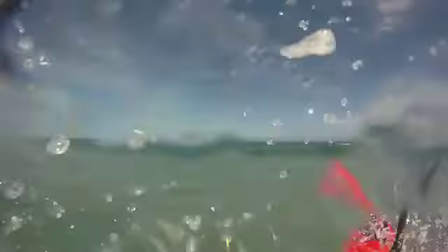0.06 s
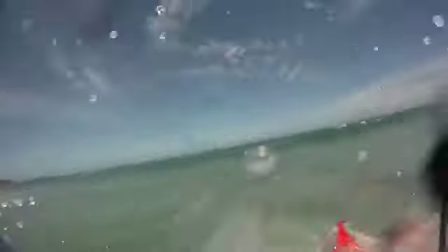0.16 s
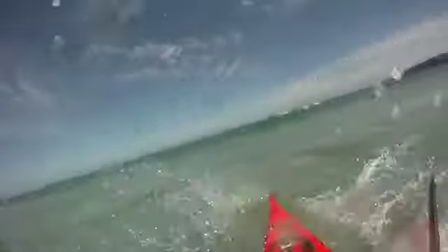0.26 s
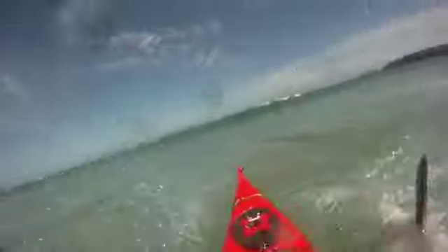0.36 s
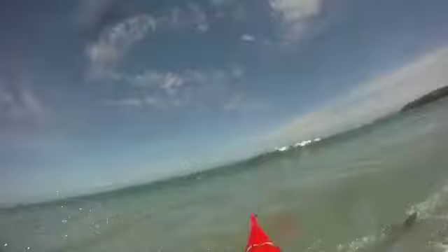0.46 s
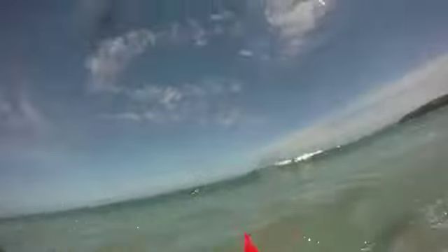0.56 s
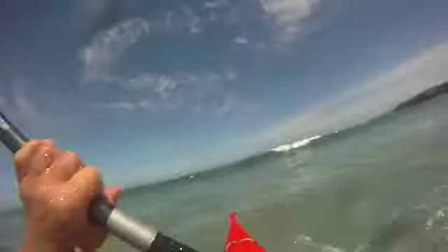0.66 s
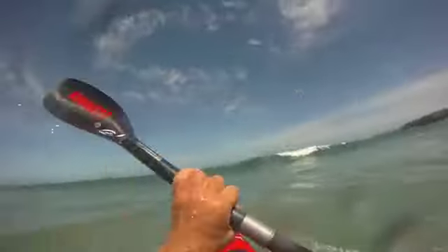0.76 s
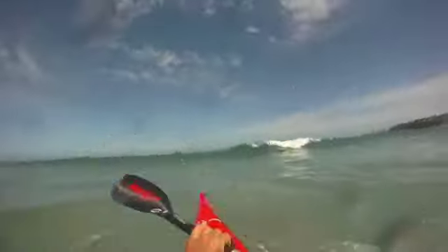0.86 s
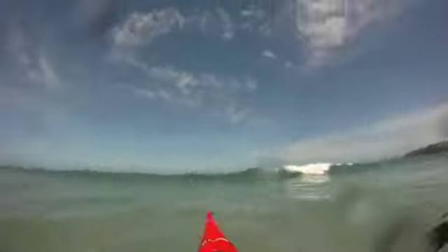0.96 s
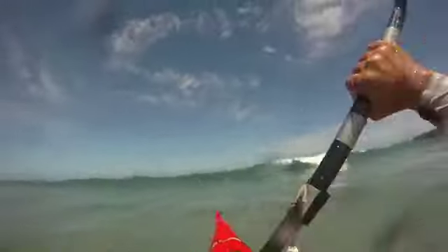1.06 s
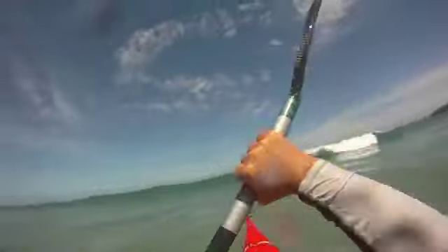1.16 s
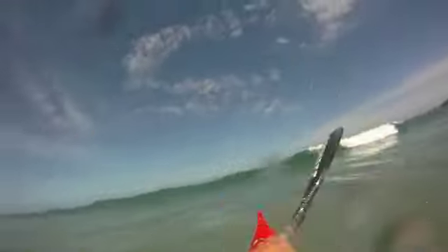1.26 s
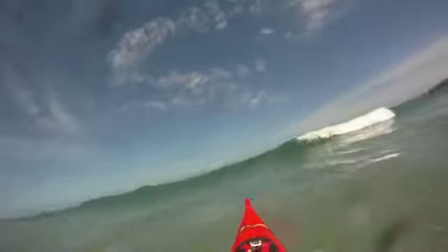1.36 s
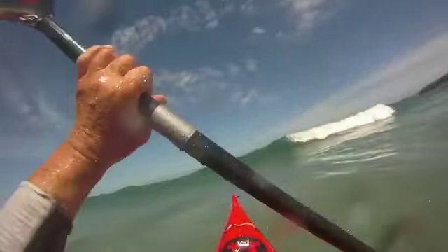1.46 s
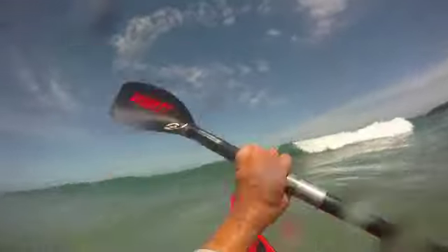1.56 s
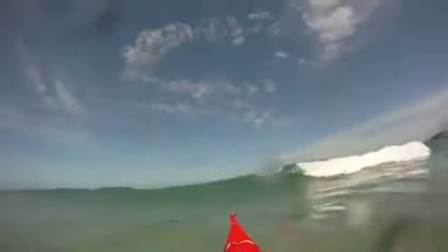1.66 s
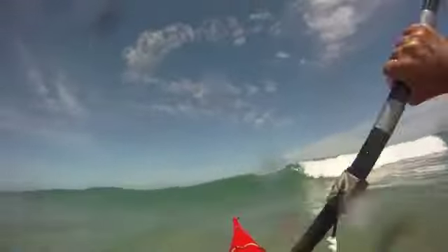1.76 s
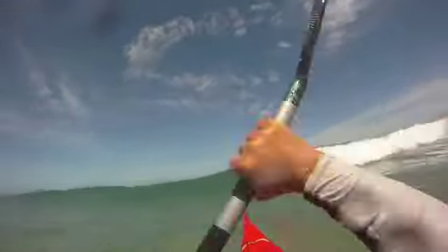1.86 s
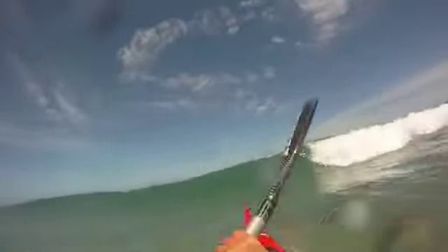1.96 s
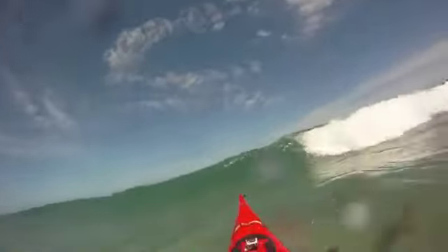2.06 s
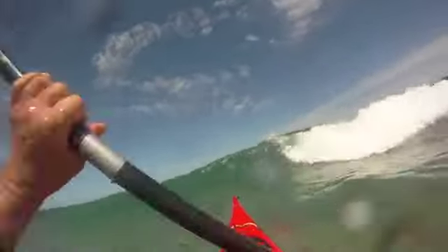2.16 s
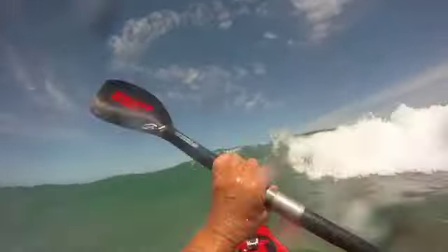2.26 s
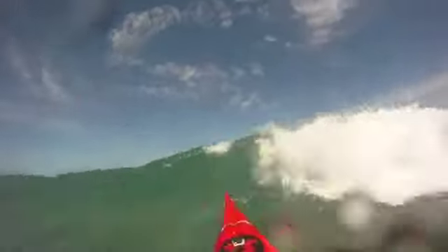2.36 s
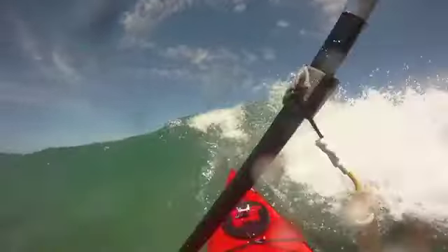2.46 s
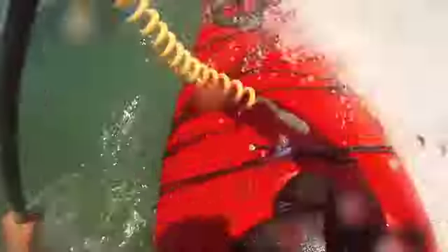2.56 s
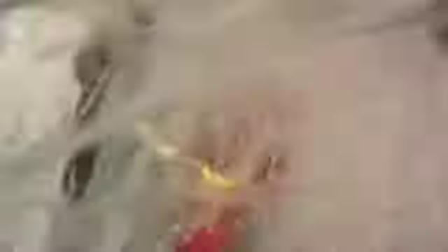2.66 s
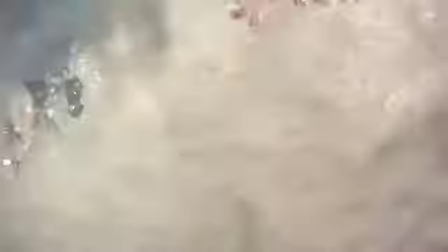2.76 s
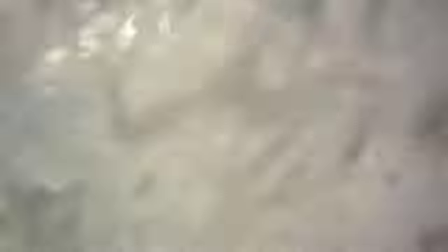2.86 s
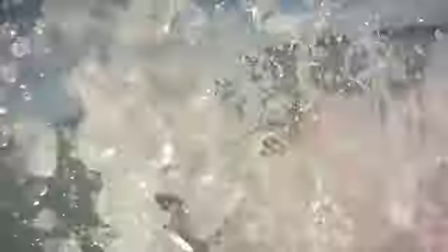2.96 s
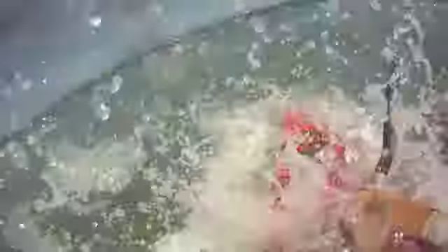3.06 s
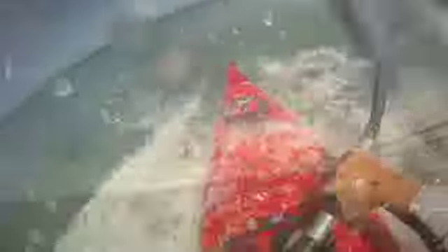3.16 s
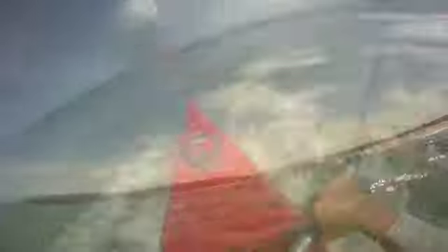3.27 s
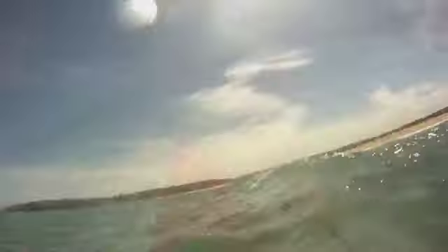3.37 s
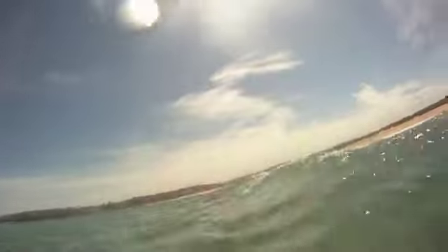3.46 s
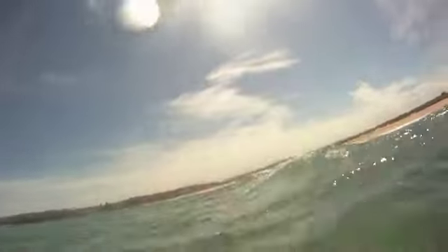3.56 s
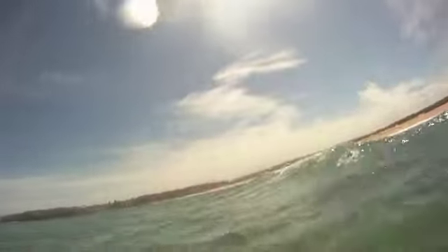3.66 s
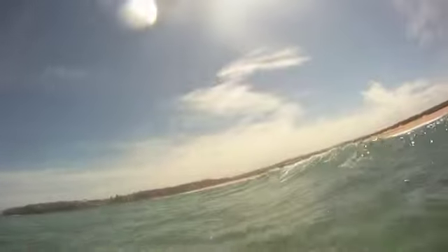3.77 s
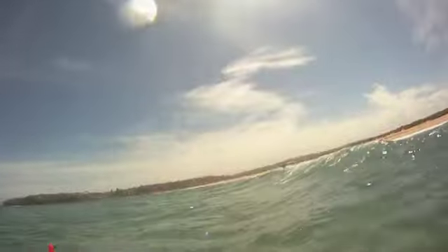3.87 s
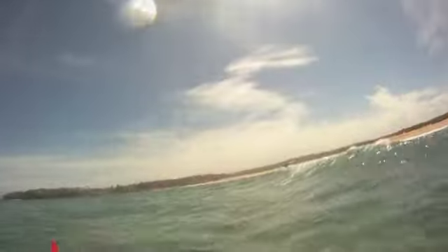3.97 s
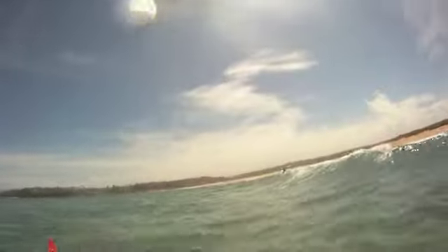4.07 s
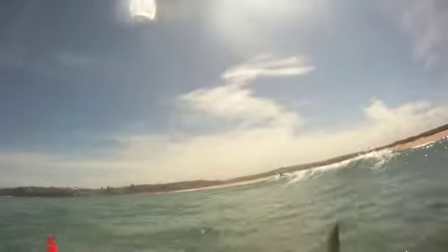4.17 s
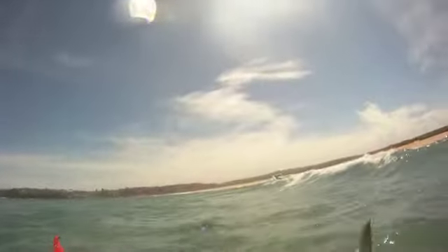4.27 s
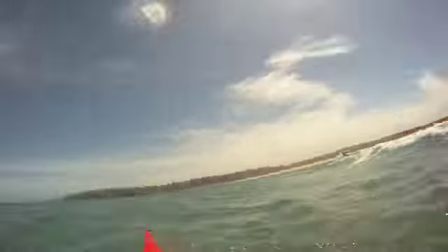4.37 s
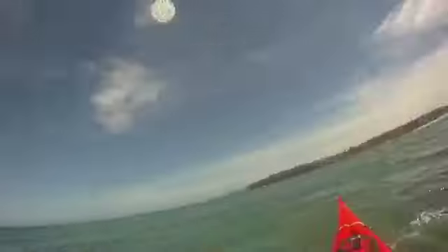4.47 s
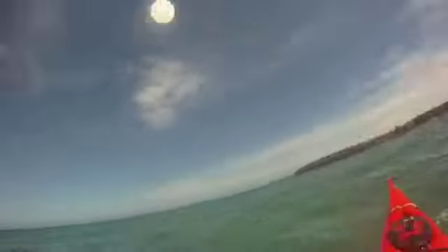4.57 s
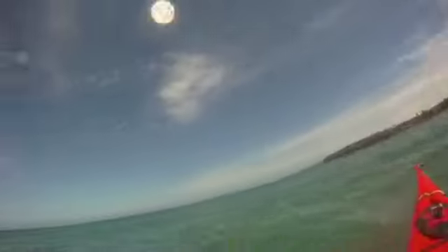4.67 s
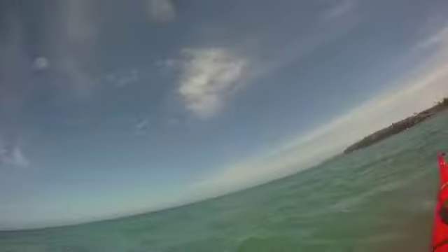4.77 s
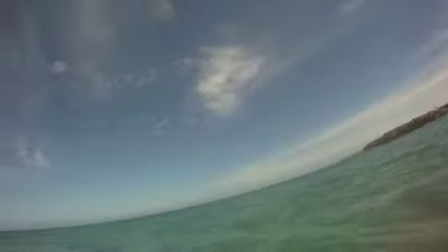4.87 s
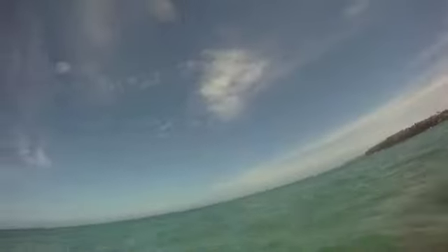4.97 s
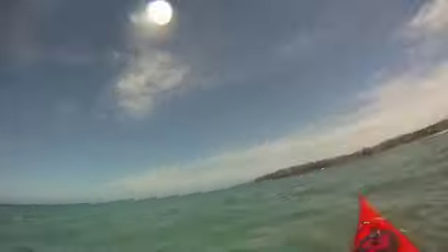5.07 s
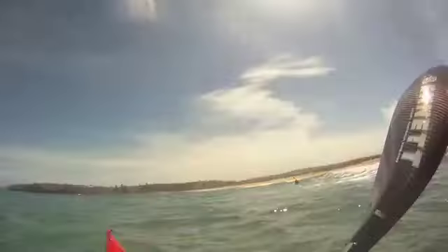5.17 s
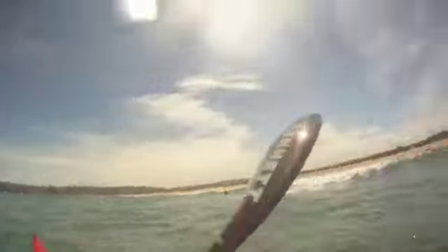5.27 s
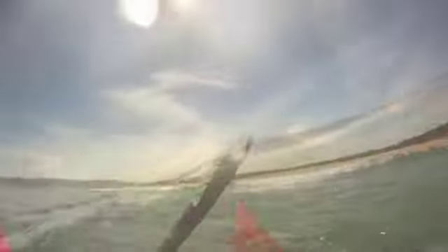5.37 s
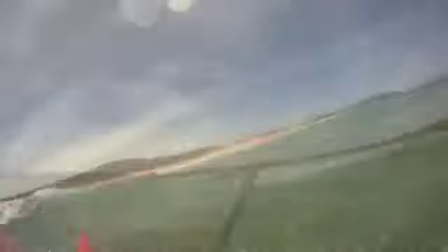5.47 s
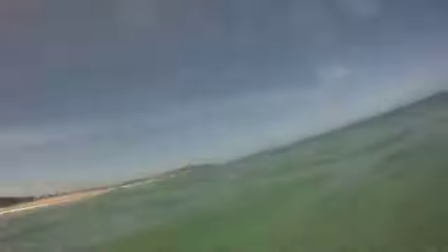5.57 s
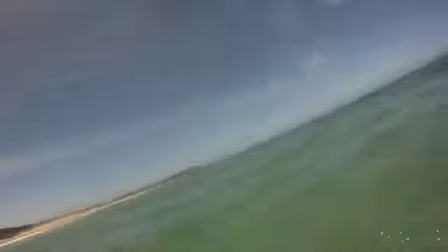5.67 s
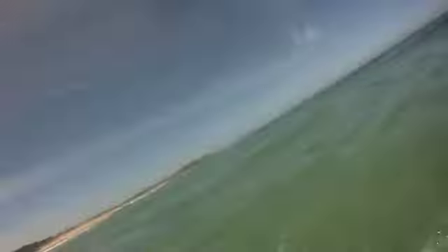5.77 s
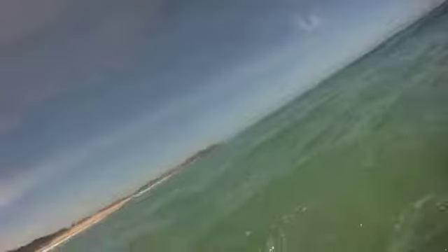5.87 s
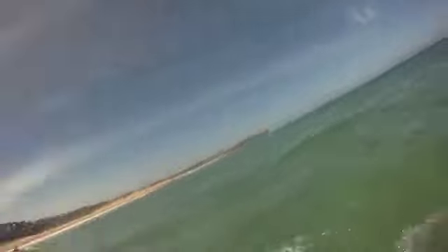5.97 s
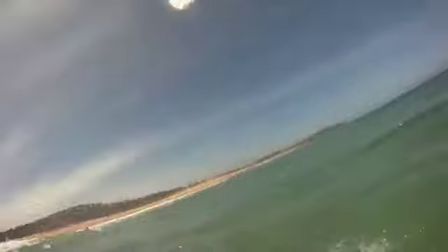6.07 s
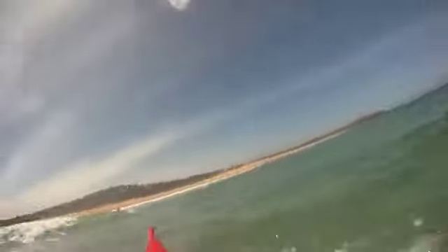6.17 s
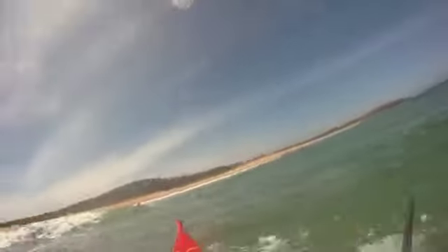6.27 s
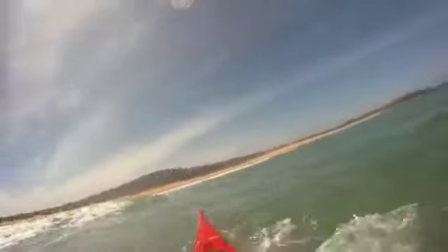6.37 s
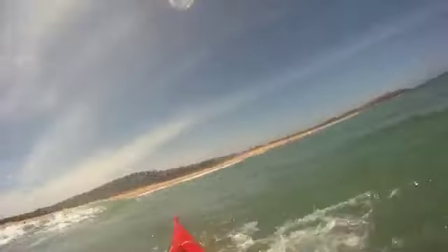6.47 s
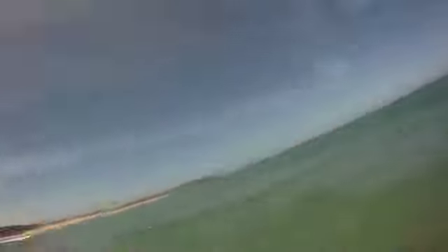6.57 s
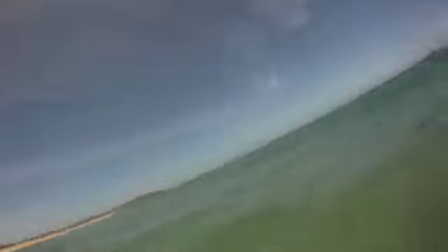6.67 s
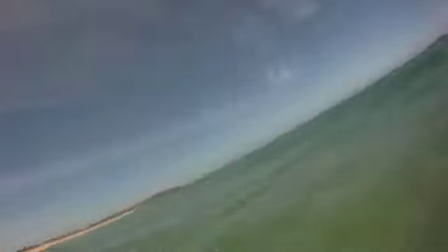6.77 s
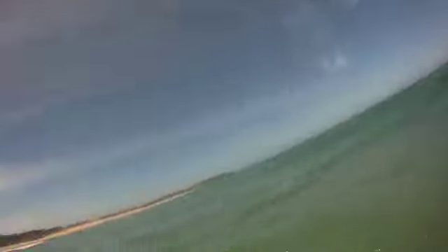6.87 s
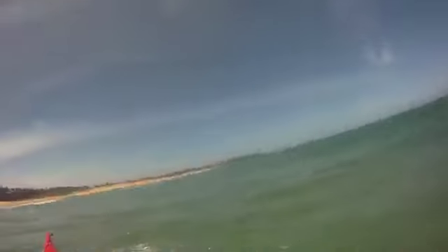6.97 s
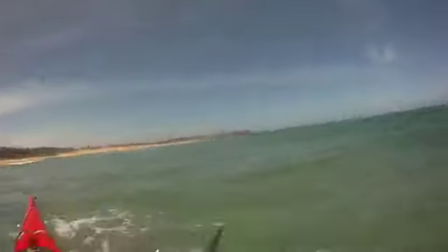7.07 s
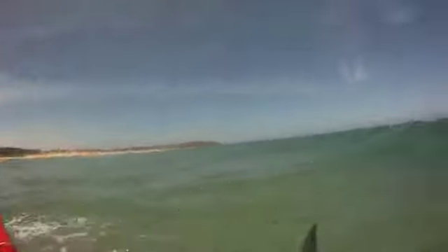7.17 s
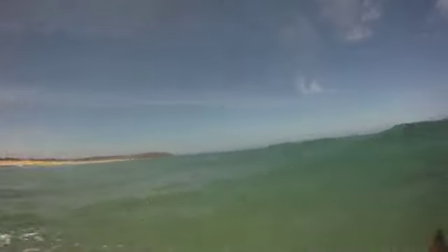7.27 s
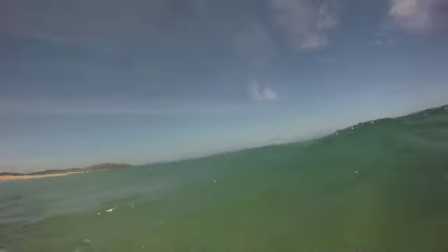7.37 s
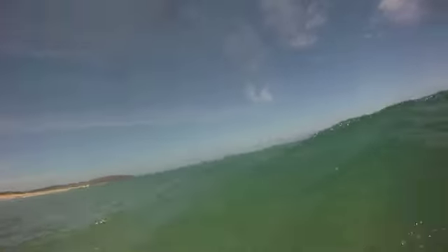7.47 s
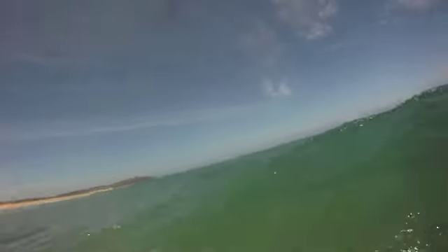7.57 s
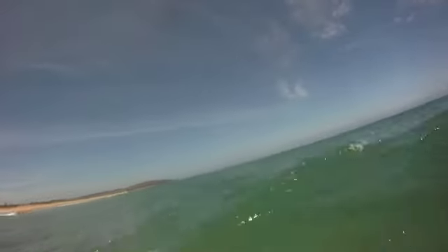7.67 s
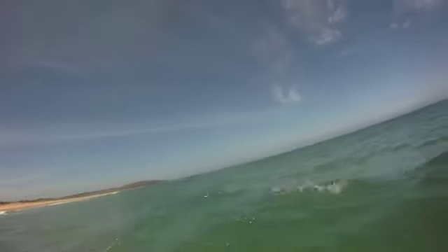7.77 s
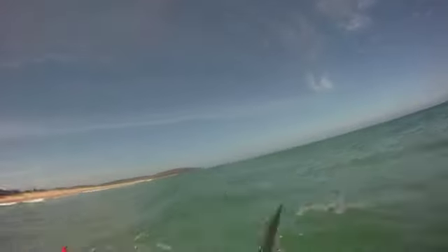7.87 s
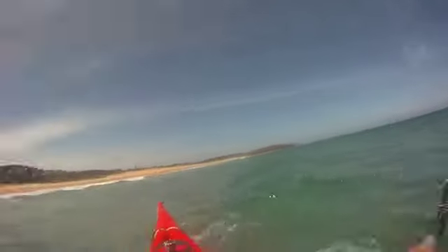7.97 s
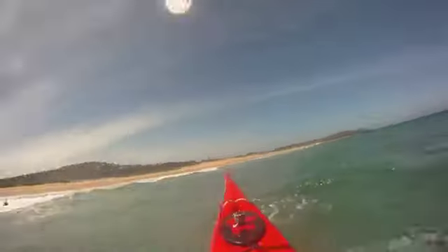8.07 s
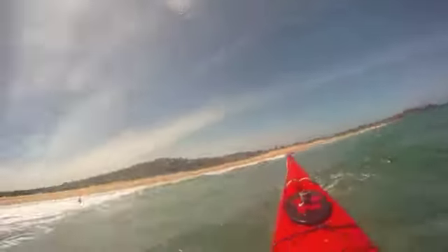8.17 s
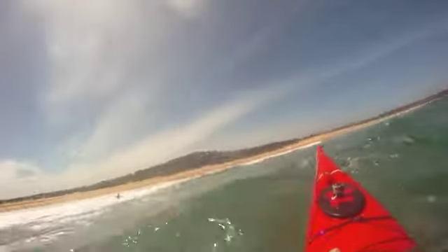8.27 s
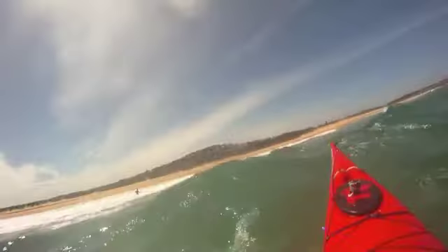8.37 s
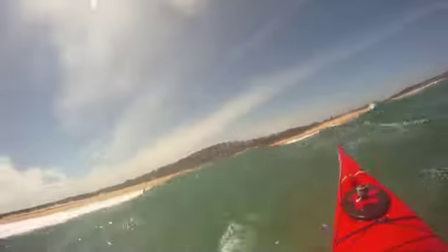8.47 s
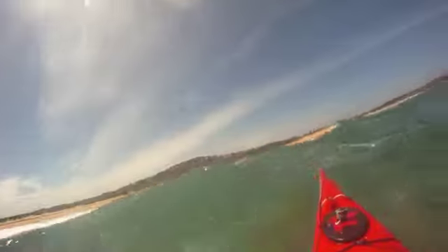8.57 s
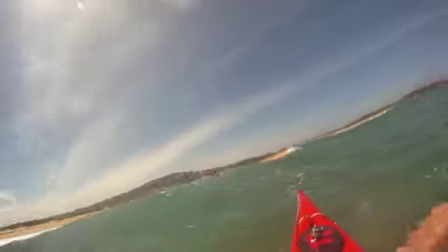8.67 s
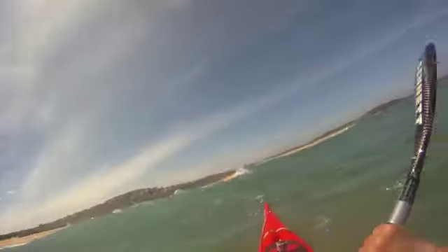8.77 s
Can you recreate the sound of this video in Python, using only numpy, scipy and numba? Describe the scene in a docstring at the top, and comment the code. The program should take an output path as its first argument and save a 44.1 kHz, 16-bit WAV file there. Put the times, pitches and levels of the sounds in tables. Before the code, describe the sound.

Violent water smacks and gurgling wash hit a kayaker's sealed camera, easing into faint bubbly swishes, low wind buffeting and tiny droplet ticks.

```python
"""A helmet camera in a sealed case rides a kayak out through surf. A first wave breaks over it at once:
drops and slugs of water, as short noisy pushes ringing the case, overload the microphone. Drips and hiss
follow, then a second wave breaks near 2.6 s. After 3.4 s the sea is calmer: low noise for buffeting wind,
bands of bubble noise for fizzing foam and swishing paddle strokes, light ticks, all coloured by resonances."""
import sys
import numpy as np
from scipy import signal
from scipy.fft import rfft, irfft
from scipy.io import wavfile
from scipy.ndimage import uniform_filter1d
from numba import njit

SR = 44100
rng = np.random.default_rng(int(sys.argv[2]) if len(sys.argv) > 2 else 0)


def wav_record(signal):
    """Record a signal, one row per channel, as 16-bit PCM in the file named by sys.argv[1]."""
    frames = np.transpose(np.atleast_2d(signal))
    bounded = np.clip(frames, -1, 1)
    # unit amplitude maps onto the largest positive 16-bit level
    quanta = np.round(bounded * 32767).astype(np.int16)
    wavfile.write(sys.argv[1], SR, quanta)


N = 388962

# the sea around the boat: (t/s, wind buffeting level/dB, slosh level/dB, foam level/dB, fine spray level/dB)
SEA_LEVELS = [(0, -13, -27, -23, -40), (.08, -36.5, -53, -41, -40), (.22, -32, -39, -34, -44),
              (.33, -39, -55, -39, -37.5), (.6, -39.5, -53, -45.5, -48.5), (1.4, -38, -52, -46, -53),
              (2.04, -40.5, -49.5, -42, -48.5), (2.22, -35.5, -48.5, -39, -46.5),
              (2.552, -41, -44.5, -37.5, -41.5), (2.95, -36, -44.5, -36.5, -48),
              (3.12, -39.5, -42, -37, -41), (3.17, -48, -59, -41, -47), (3.29, -47.5, -55.5, -43.5, -46),
              (3.5, -48, -61, -58, -66.5), (4.3, -46, -57, -55.5, -66), (5.05, -48, -60, -59.5, -66),
              (5.75, -43, -57.5, -52, -66), (6.4, -49, -56.5, -52.5, -60), (6.63, -42, -57.5, -55, -62.5),
              (7.42, -48, -57, -57.5, -63), (8.098, -48, -57.5, -53.5, -62.5),
              (8.82, -46.5, -56, -52, -59.5)]
# tone of the wind buffeting: (f/Hz, relative level per Hz/dB)
WIND_COLOUR = [(8.8, -26.5), (15, -18.5), (38, -3), (63, 2), (94, -0.5), (151, -16), (200, -23), (260, -24),
               (440, -120)]
# gain of the deepest buffeting, below 37 Hz: (t/s, level/dB)
DEEP_WIND_GAIN = [(0, 0.5), (2.5, 0.5), (3.4, -13), (5, -13), (5.7, 1), (6.3, -4), (7.8, 1.5), (8.82, -7)]
# tone laid over the water sloshing on the hull: (f/Hz, relative level per Hz/dB)
SLOSH_COLOUR = [(88, -14.5), (150, -5.5), (252, -6), (317, -5), (522, -6.5), (975, -11.5), (1800, -22),
                (2340, -62), (3960, -120)]
# colour of the case facing the surf: (f/Hz, level/dB)
CASE_IN_SURF = [(760, -27), (1300, -12), (1890, -8.5), (2210, -1), (2500, -10), (2960, -16.5), (3700, -3),
                (4130, 3), (4640, -1), (5420, -5), (6270, -5.5), (7110, 1), (8400, -7.5), (9720, -1),
                (12000, -22), (14100, -5), (15700, -13.5)]
# colour of the case beyond the break: (f/Hz, level/dB)
CASE_BEYOND_BREAK = [(760, -23.5), (1300, -16.5), (1830, -15), (2190, -7.5), (2550, -16), (3050, -21.5),
                     (3700, -11), (4130, -2.5), (4700, -12.5), (5040, -8.5), (5420, -21.5), (5890, -9.5),
                     (6410, -20), (6960, -14), (9820, -11.5), (12000, -29.5), (14000, -15.5),
                     (15700, -13.5)]
BREAK_ENDS_S, CALMING_S = 3.35, 0.28
SPLIT_HZ = 4730  # foam and dull blows below, spray and crackle above

# the breaking wave churns around the case: (t/s, hold/s, slosh level/dB, foam level/dB, spray level/dB)
WAVE_SURGES = [(.03, 0.024, -31.5, -27, -39), (2.6, 0.075, -41, -34.5, -34.5),
               (2.67, 0.1, -32.5, -27.5, -35.5), (2.82, 0.037, -35.5, -26.5, -31.5),
               (2.99, .03, -43, -40, -49), (3.08, 0.031, -41, -35.5, -50)]
SURGE_ATTACK_S, SURGE_FADE_DB_PER_S = 0.012, 203
# paddled water swishes past: (t/s, hold/s, slosh level/dB, foam level/dB, spray level/dB)
PADDLE_SWISHES = [(3.57, 0.056, -74, -53.5, -58), (3.77, 0.17, -68, -52, -59),
                  (5.08, 0.49, -70, -56.5, -62.5), (5.72, 0.11, -57.5, -48, -50.5),
                  (5.97, 0.022, -57, -52, -60), (6.07, 0.083, -60, -46, -52.5),
                  (6.55, .04, -61, -50.5, -74), (6.77, 0.16, -65, -50, -64), (6.96, 0.046, -60, -47, -56),
                  (7.55, 0.16, -62, -48.5, -58), (7.85, 0.016, -71, -51, -57),
                  (8.36, 0.19, -81, -48.5, -54.5)]
SWISH_ATTACK_S, SWISH_FADE_DB_PER_S = 0.028, 80
# a sheet of water pours over the case: (t/s, foam level/dB, length/ms)
WATER_SHEETS = [(0.048, -12, 44), (2.7, -20.5, 36), (2.74, -26, 35), (2.833, -43, 8.1), (3.219, -29, 9.8)]

# light drops: 400 candidates, so the densest patter stops at about 45 per s
PATTER_CANDIDATES, PATTER_PER_S = 400, 50
PATTER_DB, PATTER_SPREAD_DB = 3, 2.5  # least peak against the foam level, and random excess
# fine drops of spray tick on the case: (t/s, peak level/dB)
SPRAY_TICKS = [(4.4526, -37), (4.5044, -35), (5.1011, -38), (5.2363, -41), (5.6274, -35), (5.7232, -35),
               (6.014, -38), (6.1178, -39), (6.138, -31), (6.3313, -35), (6.656, -32), (6.7227, -32.5),
               (6.858, -36), (7.428, -39), (7.4996, -40), (7.512, -29.5), (7.557, -36), (7.5964, -32),
               (7.766, -47), (8.1965, -35), (8.2604, -38), (8.3878, -26)]
# drips plink on the case: (t/s, peak level/dB, f/Hz, rise/s)
CASE_DRIPS = [(0.407, -31, 6960, .0008), (0.436, -18, 5500, .001), (0.469, -19.5, 6800, 0.0005),
              (.931, -31, 7000, 0.00089), (3.016, -21, 3550, 0.0018), (5.845, -41.5, 2100, 0.0033),
              (6.03, -43, 2350, 0.0027), (6.827, -32, 5900, .0007), (6.838, -35, 5900, .0007),
              (7.765, -45, 7000, .002), (7.87, -44, 2250, 0.0024), (8.058, -43, 2270, 0.0023),
              (8.328, -48, 2500, 0.0022)]
# water shoves the case or gulps along the hull: (t/s, peak level/dB, f/Hz, rise/s)
WATER_SHOVES = [(.000, -12, 76.6, 0.0052), (0.196, -13, 71, 0.019), (.394, -21, 280, 0.0016),
                (2.761, -15.5, 169, 0.0059), (2.78, -20, 223, 0.0041), (2.844, -18.5, 91, 0.0054),
                (3.071, -30, 202, 0.0045), (3.137, -8.5, 605, 0.0023), (5.829, -43, 398, 0.0048),
                (6.646, -38, 66.4, 0.016), (6.949, -47, 910, 0.0035), (8.37, -46, 597, 0.005)]

# water hitting the case: (t/s, face peak level/dB, thud peak level/dB, thud f/Hz,
# wall mode level against the face/dB, crackle level against the face/dB, contact/ms)
WATER_SLAPS = [(0.0134, -7, -9, 454, 2, -32, 1.9), (0.0484, -6, -33, 151, -17, 4, 3.1),
               (0.0566, -4.5, -1.5, 656, 8, 12, 1.1), (0.0627, -13, -23, 191, -4, -3, 1.5),
               (0.0668, 4, -21, 170, -3.5, 9, 1.9), (0.0732, 22, 1, 242, -5, -11, 2.2),
               (0.123, -9, -47, 288, -11, -3, 1.1), (0.1272, -13, -24.5, 301, -11, -10, 2.5),
               (0.157, -25, -44, 301, -16, 5, 2), (0.2316, -12, -10.5, 507, -4, -29, 2.3),
               (0.2595, -13, -26, 331, -1, -17, 2.6), (0.2734, -20.5, -22.5, 430, 4, -14, 2.6),
               (0.2896, -16, -33, 221, -26, 2.5, 1.2), (0.384, -3, -10, 466, -0.5, -41, 0.56),
               (0.4347, -20, -60, 441, -30, -11, 3.9), (0.9058, -4, -7, 438, 3, -26, 2.76),
               (1.0853, -33, -52, 151, -16, 1, 1.6), (1.4919, -31.5, -29.5, 242, -4, -12, 2.7),
               (1.6376, -19, -50, 151, -29, -9, 1.5), (1.7942, -29.5, -29, 146, -0.5, -7, 1.7),
               (2.5619, -5.5, -45, 149.6, -15, -10.5, 0.82), (2.5673, 6.5, -8.5, 480, -1.5, -29, 2.04),
               (2.6605, -13, -44, 700, -2, 7, 1), (2.6648, -1.5, -38, 196, -17, -3, 0.74),
               (2.6843, -14, -10, 440, -8, 4, 0.78), (2.703, -25, -41, 304, -18, -14, 2.6),
               (2.7142, 1.5, -14, 710, -1, -10, 4.7), (2.7305, -6, -12, 151, -15, -7, 0.75),
               (2.7492, -17, -20, 298, -5, -5, 1.7), (2.7528, 7, 0.5, 336, 2.5, -5, 1.34),
               (2.758, -10, -24, 180, -20, -14, 0.91), (2.7713, -12, -8.5, 153, -9, -17, 0.93),
               (2.817, -11, -28, 272, -18.5, 1, 1.3), (2.8392, -2.5, -12, 265, -26, -1, 1.8),
               (2.8476, -11, -23, 151, -14, -17, 1.1), (2.925, -15.5, -39, 151, -15, -1, 3.5),
               (2.9346, -18, -24, 186, 1.5, -13, 0.42), (3.0076, -23, -32, 231, -9, 1, 0.89),
               (3.0117, -17.5, -28, 700, -4, 10.5, 0.98), (3.0174, -19, -29, 223, -11, -31, 1.7),
               (3.1137, -7.5, -17, 159, -27, -3, 1.55), (3.1335, -9, -25, 149, -25, 5.5, 2.1),
               (3.139, 11, -2, 180, -32, -5, 1.4), (3.1811, -6, -22, 226, -37, 3.5, 2.3),
               (3.2283, -16, -15.5, 256, -15, -5, 0.79), (3.232, -2, -9, 281, -34, -0.5, 1.85),
               (3.2839, -23, -54, 223, -26, 4, 1.5), (3.3633, -39.5, -24.5, 388, 14, -19, 1.9),
               (3.972, -32, -53, 402, -18, -10, 1.2), (4.7144, -29.5, -46, 152, -27, -15, 1.3),
               (6.8157, -31, -54.5, 191, -20, -12, 1.4), (6.8868, -34, -50, 175, -18, -9, 2.6)]
WALL_HZ, WALL_Q = 2170, 4.5  # lowest wall mode of the case
FACE_HZ, FACE_HZ_PER_DB = 5080, 38  # more crackle rings the face higher
BODY_DB = -2.5  # peak of the case body against the thud
DIRECT = 0.26  # gain of the raw blow into the face

DUCK_DB, DUCK_ATTACK_S, DUCK_RELEASE_S = -13.0, 0.003, 0.022
CLIP_LEVEL, TOP_HZ = 0.77, 15750


def undb(db):
    """Decibels to gain."""
    return 10 ** (np.asarray(db) / 20)


def unit(x):
    """Scale to rms 1."""
    return x / np.sqrt(np.mean(x ** 2))


def peak_one(x):
    """Scale to peak 1."""
    return x / np.abs(x).max()


def add_at(out, start_s, sound):
    """Mix a sound into the output from its start time."""
    start = int(start_s * SR)
    out[start:start + len(sound)] += sound


def response(points, size):
    """Causal impulse response of a colour, from the cepstrum of its log gain."""
    hz, db = np.transpose(points)
    bins_hz = np.arange(size // 2 + 1) * SR / size
    log_gain = np.interp(np.log(bins_hz + 1), np.log(hz), db) * np.log(10) / 20
    cepstrum = irfft(log_gain)
    # fold the later half onto the earlier: minimum phase
    cepstrum[1:size // 2] *= 2
    cepstrum[size // 2 + 1:] = 0
    return irfft(np.exp(rfft(cepstrum)))[:size // 2]


def colour(x, points, size):
    """Pass a sound through a colour."""
    return signal.fftconvolve(x, response(points, size))[:len(x)]


def split(x, hz):
    """Split a sound below and above a frequency."""
    filters = (signal.butter(4, hz, kind, fs=SR, output="sos") for kind in ("low", "high"))
    return [signal.sosfilt(sos, x) for sos in filters]


def walk(rate):
    """Random levels held 1 / rate s, smoothed twice and scaled to rms 1."""
    k = int(SR / rate)
    held = np.repeat(rng.standard_normal(N // k + 1), k)
    smooth = uniform_filter1d(uniform_filter1d(held, k), k)
    return unit(smooth[:N])


def washes(rows, attack_s, fade_db_per_s):
    """Power of slosh, foam and spray that rises, holds and fades for each row."""
    t, power = np.arange(N) / SR, 0
    for start, hold, *dbs in rows:
        rise = np.clip((t - start) / attack_s, 0, 1)
        fade = undb(-fade_db_per_s * np.maximum(t - start - attack_s - hold, 0))
        power = power + (undb(dbs)[:, None] * rise * fade) ** 2
    return power


def water_levels():
    """Wind, slosh, foam and spray in dB: the sea, with the power of surges and swishes added."""
    s, *columns = np.transpose(SEA_LEVELS)
    wind_db, *water_db = (np.interp(np.arange(N) / SR, s, c) for c in columns)
    power = undb(water_db) ** 2
    power = power + washes(WAVE_SURGES, SURGE_ATTACK_S, SURGE_FADE_DB_PER_S)
    power = power + washes(PADDLE_SWISHES, SWISH_ATTACK_S, SWISH_FADE_DB_PER_S)
    return wind_db, *(10 * np.log10(power))


def wind_buffets():
    """Wind shakes the case: low noise with a wandering level, its deepest part balanced apart."""
    gusts = rng.standard_normal(N) * undb(1.5 * walk(11))
    deep, rest = split(unit(colour(gusts, WIND_COLOUR, size=16384)), 37.0)
    deep_db = np.interp(np.arange(N) / SR, *np.transpose(DEEP_WIND_GAIN))
    return rest + undb(deep_db) * deep


def fizz(edges_hz, per_s, spread_db, share, flicker_db, rate, churn):
    """Bands of bubble hiss; in each, near bubbles pop, the level wanders and churning water sputters."""
    out, sputter = 0, walk(350)
    for edges in zip(edges_hz, edges_hz[1:]):
        at = rng.integers(0, N, int(per_s * N / SR))
        pop_db = spread_db * np.minimum(rng.exponential(size=len(at)), 4)
        pops = np.zeros(N)
        pops[at] = undb(pop_db) * np.sign(rng.standard_normal(len(at)))
        # share: part of the power that comes from single pops
        hiss = np.sqrt(1 - share) * rng.standard_normal(N) + np.sqrt(share) * unit(pops)
        # one sputter is common to all bands, one belongs to this band
        hiss *= undb(flicker_db * walk(rate) + churn * (1.14 * sputter + walk(250)))
        out = out + signal.sosfilt(signal.butter(2, edges, "band", fs=SR, output="sos"), hiss)
    return out


def hull_slosh(churn):
    """Water sloshes on the hull: low bands of lumpy bubble noise."""
    slosh = fizz([110, 220, 440, 900, 2400], per_s=65, spread_db=1.5, share=0.25,
                 flicker_db=0.0, rate=19, churn=churn)
    return unit(colour(slosh, SLOSH_COLOUR, size=4096))


def foam_and_spray(churn):
    """Bubble hiss through the case, whose colour crossfades from surf to calm."""
    water = fizz([700, 1500, 3000, 4800, 6500, 8500, 17000], per_s=450, spread_db=1.5, share=0.4,
                 flicker_db=2.23, rate=22, churn=churn)
    calm = np.clip((np.arange(N) / SR - BREAK_ENDS_S) / CALMING_S, 0, 1)
    in_surf = split(colour(water, CASE_IN_SURF, size=2048), SPLIT_HZ)
    beyond = split(colour(water, CASE_BEYOND_BREAK, size=2048), SPLIT_HZ)
    return [(1 - calm) * unit(w) + calm * unit(d) for w, d in zip(in_surf, beyond)]


def pouring():
    """Gain of the water sheets, each a rounded swell."""
    t, poured = np.arange(N) / SR, np.zeros(N)
    for start, db, ms in WATER_SHEETS:
        progress = np.clip((t - start) * 1000 / ms, 0, 1)
        poured += undb(db) * np.sqrt(np.abs(np.sin(np.pi * progress)))
    return poured


def sea(wind_db, slosh_db, foam_db, spray_db):
    """Wind shakes the case, water sloshes on the hull, foam and spray fizz through the case."""
    # the louder the foam, the nearer and lumpier the water
    churn = 1.1 + 1.8 * np.clip((foam_db + 40) / 15, 0, 1)
    out = undb(wind_db) * wind_buffets() + undb(slosh_db) * hull_slosh(churn)
    foam, spray = foam_and_spray(churn)
    poured = pouring()
    # poured sheets lift the spray 2 dB more than the foam
    return out + (undb(foam_db) + poured) * foam + (undb(spray_db) + undb(2.0) * poured) * spray


def blows(ms):
    """Rough pushes of the given contact times, raw and as the case passes them below and above its split."""
    t = np.arange(1024) / SR
    push = np.sin(np.pi * np.clip(t * 1000 / ms, 0, 1))
    rough = push * rng.standard_normal((len(ms), len(t)))
    # a little of the blow reaches the microphone directly
    case = response(CASE_IN_SURF, size=2048) + 0.026 * (t == 0)
    heard = signal.fftconvolve(rough, case[None])[:, :len(t)]
    return t, rough, *split(heard, SPLIT_HZ)


def patter(foam_db):
    """Light drops strike the case at random, more often and harder as the foam gets louder."""
    out = np.zeros(N + 2048)
    at, luck, size = rng.random((PATTER_CANDIDATES, 3)).T
    at = (at * N).astype(int)
    thickness = np.clip((foam_db[at] + 56) / 20, 0, 1)
    falls = luck < PATTER_PER_S * N / SR / len(at) * thickness
    peak_db = np.minimum(foam_db[at], -32) - PATTER_SPREAD_DB * np.log(size) + PATTER_DB
    *_, dulls, sharps = blows(np.full((len(at), 1), 1.4))
    for i, db, drop in zip(at[falls], peak_db[falls], (dulls + sharps)[falls]):
        out[i:i + len(drop)] += undb(db) * peak_one(drop)
    return out[:N]


def ticks():
    """Drops too light to ring the walls leave only the crackle."""
    out = np.zeros(N + 2048)
    *_, sharps = blows(np.full((len(SPRAY_TICKS), 1), 1.2))
    for (s, db), sharp in zip(SPRAY_TICKS, sharps):
        add_at(out, s, undb(db) * peak_one(sharp))
    return out[:N]


def swings(rows):
    """Sine swings, each building up over its rise time and then dying away."""
    out, t = np.zeros(N + SR), np.arange(SR // 2) / SR
    for s, db, hz, rise in rows:
        age = t / rise
        add_at(out, s, undb(db) * np.sin(2 * np.pi * hz * t) * (age * np.exp(1 - age)) ** 2)
    return out[:N]


def drips():
    """Drips plink on the case as brief high swings."""
    return swings(CASE_DRIPS)


def shoves():
    """Water shoves the case or gulps along the hull as lower swings."""
    return swings(WATER_SHOVES)


def slaps():
    """Each slap rings the struck face and the lowest wall mode, crackles on top, and thuds in the trapped air."""
    out = np.zeros(N + 2048)
    t, rough, dulls, sharps = blows(np.array(WATER_SLAPS)[:, -1:])
    # the body of the case answers between 336 and 2020 Hz
    bodies = split(split(rough, 2020.0)[0], 336.0)[1]
    wall_mode = signal.iirpeak(WALL_HZ, WALL_Q, fs=SR)
    walls = signal.lfilter(*wall_mode, split(rough, 3270.0)[0])
    for row, raw, dull, sharp, body, wall in zip(WATER_SLAPS, rough, dulls, sharps, bodies, walls):
        s, face_db, thud_db, thud_hz, wall_db, sharp_db, _ = row
        face_mode = signal.iirpeak(FACE_HZ + FACE_HZ_PER_DB * sharp_db, 1.6, fs=SR)
        face = signal.lfilter(*face_mode, signal.lfilter(*face_mode, dull + DIRECT * raw))
        thud = np.sin(2 * np.pi * thud_hz * t) * np.exp(-t * thud_hz / 0.47)
        thud *= 1 - np.exp(-t / 0.00049)  # soft onset
        blow = peak_one(face) + undb(sharp_db) * peak_one(sharp) + undb(wall_db) * peak_one(wall)
        boom = peak_one(thud) + undb(BODY_DB) * peak_one(body)
        add_at(out, s, undb(face_db) * blow + undb(thud_db) * boom)
    return out[:N]


def scene():
    """Mix the sea, the drops and the slaps; one microphone feeds both channels."""
    levels = water_levels()
    foam_db = levels[2]
    mix = sea(*levels) + patter(foam_db) + ticks() + drips() + shoves() + slaps()
    return np.tile(mix, (2, 1))


@njit
def duck(x, top, attack, release):
    """Gain control: drops soon after a loud peak and climbs back."""
    y, envelope = np.empty(len(x)), 0.
    for i in range(len(x)):
        y[i] = x[i] * min(1., top / (envelope + 1e-9))
        speed = attack if abs(x[i]) > envelope else release
        envelope += (abs(x[i]) - envelope) * speed
    return y


def record(dry):
    """The camera ducks after loud slaps, clips what comes too fast, and cuts the top."""
    held = duck(dry[0], undb(DUCK_DB), 1 / (DUCK_ATTACK_S * SR), 1 / (DUCK_RELEASE_S * SR))
    clipped = np.clip(held, -CLIP_LEVEL, CLIP_LEVEL)
    low_pass = signal.ellip(12, .2, 90, TOP_HZ, fs=SR, output="sos")
    return np.tile(signal.sosfilt(low_pass, clipped), (2, 1))


dry = scene()
out = record(dry)
wav_record(out)
```